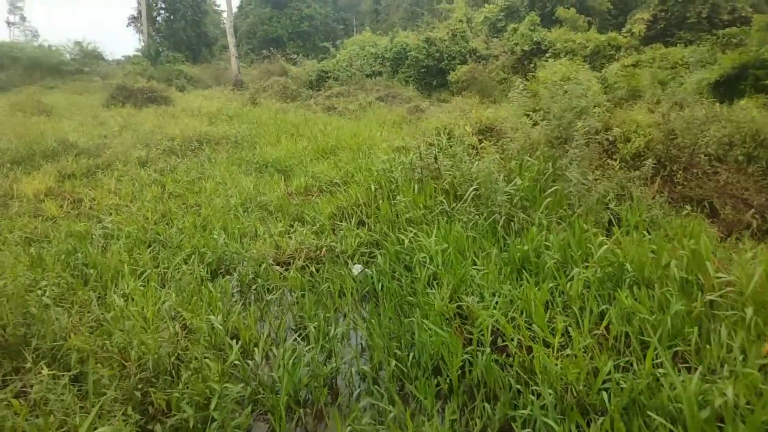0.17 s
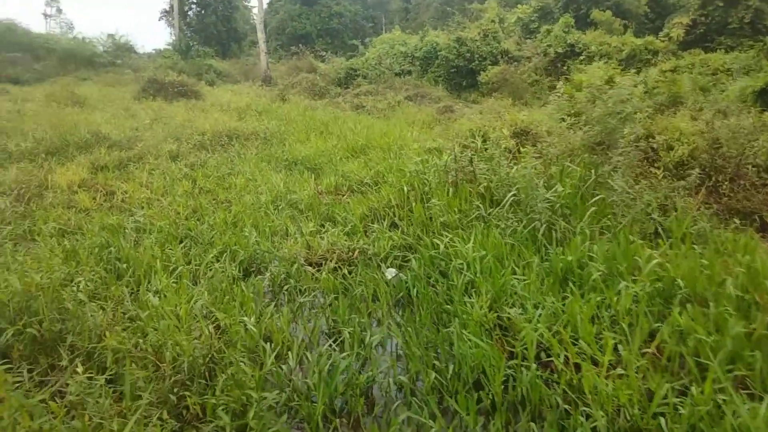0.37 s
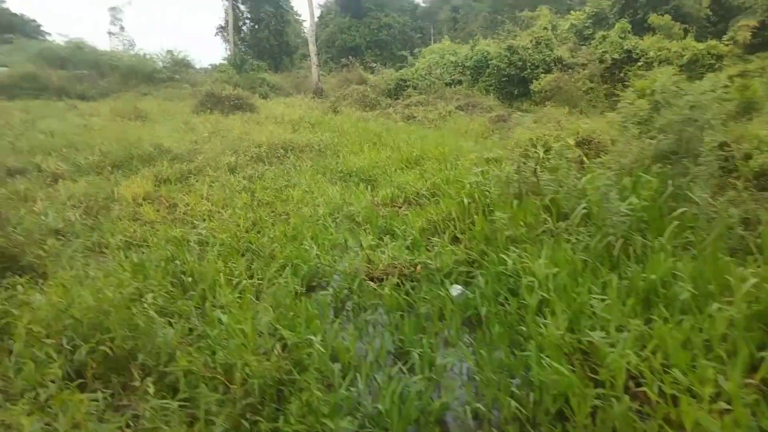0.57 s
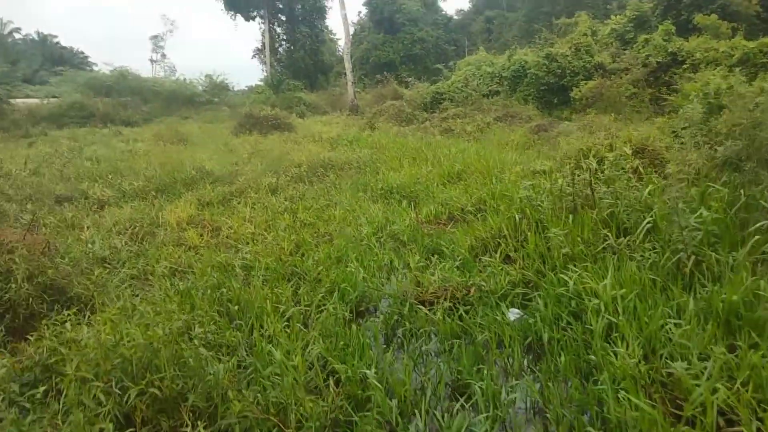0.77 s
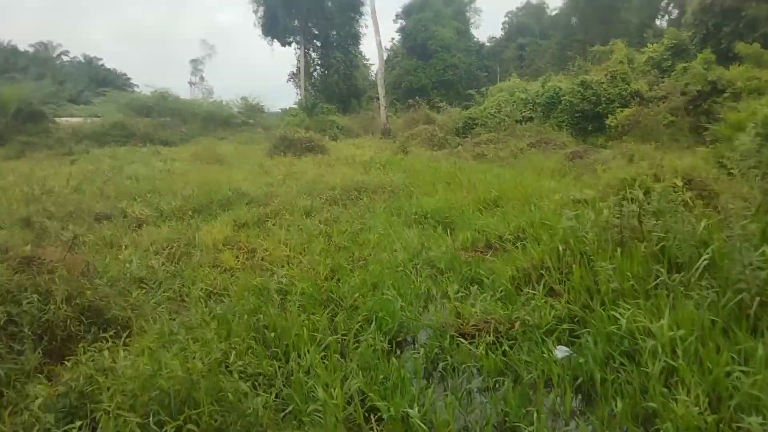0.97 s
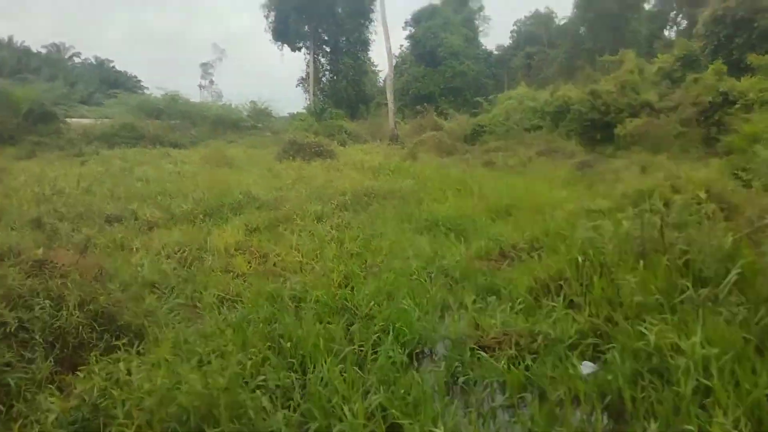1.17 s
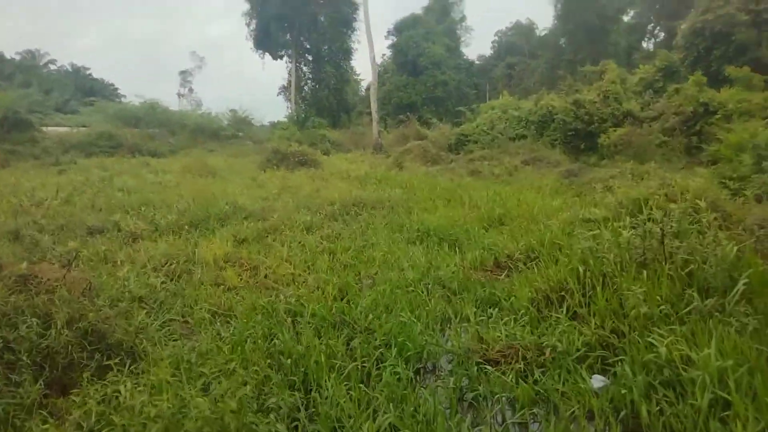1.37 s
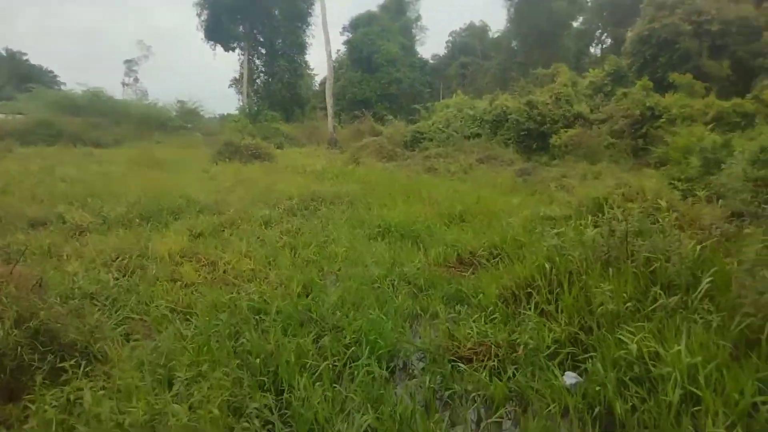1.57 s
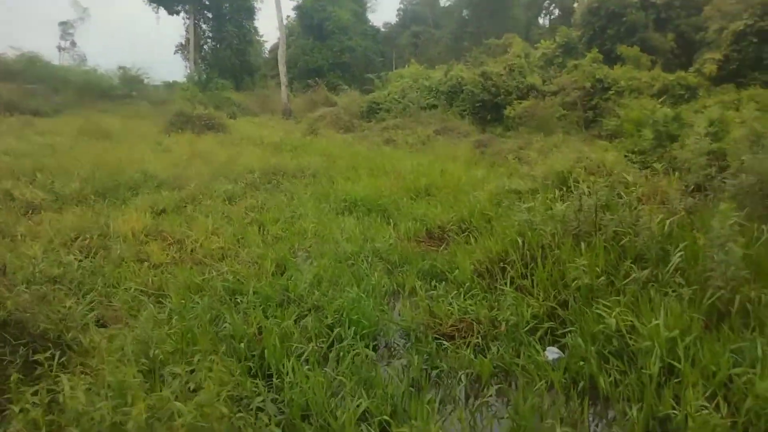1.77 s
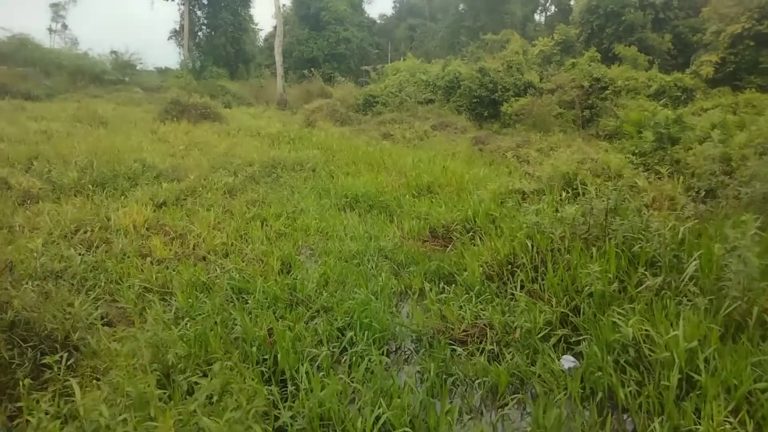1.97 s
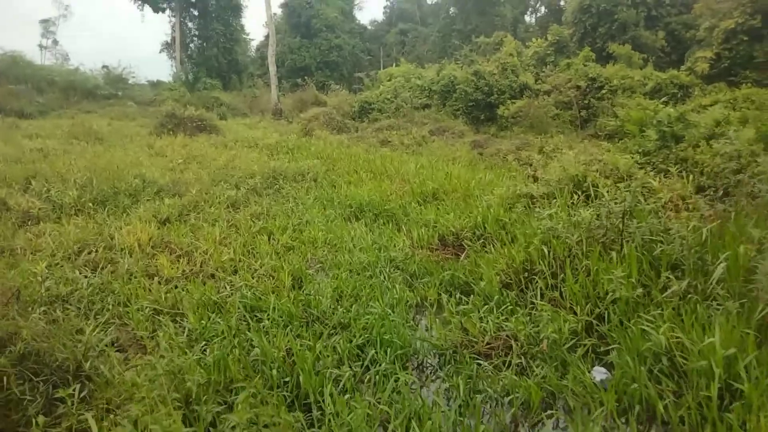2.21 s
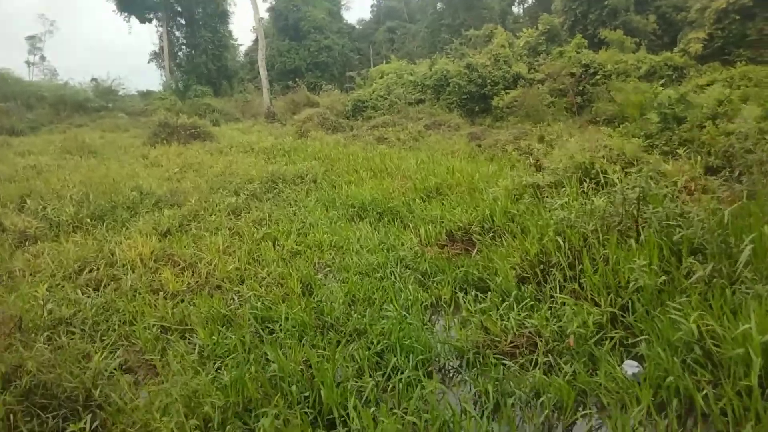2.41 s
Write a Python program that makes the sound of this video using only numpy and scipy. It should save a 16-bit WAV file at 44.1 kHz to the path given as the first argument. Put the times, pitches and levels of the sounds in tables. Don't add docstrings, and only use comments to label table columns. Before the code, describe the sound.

A nearby frog croaks four times in quick, even succession, each a short dry rattle of fast pulses; then wet stems crackle and snap close to the microphone, with faint far frogs and soft insects outdoors.

```python
import sys
import numpy as np
from scipy import signal
from scipy.fft import rfft, irfft
from scipy.io import wavfile

SR = 44100
rng = np.random.default_rng(int(sys.argv[2]) if len(sys.argv) > 2 else 0)


def boost_factor(decibels):
    exponent = np.asarray(decibels, float) / 20
    return 10 ** exponent


def unload_audio(sound):
    columns = np.transpose(np.atleast_2d(sound))
    steps = np.round(np.clip(columns, -1, 1) * 32767)
    wavfile.write(sys.argv[1], SR, steps.astype(np.int16))


N = 108045

# start in seconds, slowest pulse gap in seconds,
# time of the closing speed-up in seconds, time taken to slow down in seconds.
NEAR_CALLS = [
    (.1141, .0044, .0547, .00415),
    (.291, .00548, .039, .00707),
    (.4686, .00501, .0448, .00525),
    (.6585, .0056, .0371, .00795),
]
FAR_CALLS = [
    (1.5348, .00443, .0729, .00454),
    (1.7382, .00499, .0541, .00357),
    (1.936, .00485, .0578, .00404),
]
FARTHEST_CALLS = [
    (.862, .0045, .07, .004),
    (1.612, .0045, .04, .004),
    (1.797, .0045, .045, .004),
    (2.11, .0045, .09, .004),
    (2.295, .0045, .08, .004),
]
NEAR_LEVELS = [-14.5, -14.5, -13.5, -15]
FAR_LEVELS = [-36, -35.5, -36]
FARTHEST_LEVELS = [-48.5, -52.5, -47, -56, -55]
NEAR_SWELLS = [3, -1, 0, -.5]
FAR_SWELLS = [1, 1, -1]
# pitch in Hz, level in dB, swell time in seconds, after-ring level in dB,
# after-ring t60 in seconds, fade late in the call in dB per second.
NEAR_SAC = [(1640, -5.5, .00095, -3, .013, 800), (2270, -1, .00057, -13, .03, 1100),
            (3780, -.5, .001, -20, .03, 1400), (4040, -5.5, .0008, -16, .02, 1400),
            (4880, -19.5, .0004, -3, .022, 1500)]
FAR_SAC = [(2200, -7, .0008, -9, .02, 900), (2800, -6, .0005, -12, .015, 1500),
           (3520, 0, .0006, -11, .02, 600), (3850, -12, .0008, -11, .02, 400)]

# time in seconds, level in dB.
TRAMPLING = [(0.1, -43), (0.24, -38.5), (0.42, -39), (0.62, -49), (0.76, -39.5), (0.84, -53.5),
             (0.992, -38.5), (1.148, -43), (1.248, -33), (1.3, -41.5), (1.36, -40.5), (1.5, -46),
             (1.66, -42.5), (1.72, -42.5), (1.8, -38), (1.92, -44.5), (2.1, -50.5), (2.17, -45.5)]
# time in seconds, level in dB.
BRUSHING = [(0.0, -56), (0.01, -58), (0.3, -51.5), (0.35, -62), (0.42, -49), (0.51, -70), (0.76, -65),
            (0.77, -59), (0.79, -75), (0.87, -76), (0.9, -54), (1.01, -51), (1.42, -62), (1.62, -56.5),
            (1.8, -53), (2.01, -73), (2.44, -71), (2.45, -66)]
# frequency in Hz, level in dB.
CRACKLE_COLOUR = [(200, -24.5), (500, -17.5), (1300, -13), (1800, -2.5), (2200, 0), (2600, -5.5),
                  (3100, -15), (4500, -25.5)]
SWISH_COLOUR = [(2500, 5), (5000, -19), (6500, -5), (9000, 8), (12500, -2), (15000, 6.5)]
# time in seconds, level in dB, pitch in Hz.
BLADE_SNAPS = [(0.2342, -30.0, 2010), (0.3853, -29.0, 2060), (0.7502, -27.0, 1920), (0.7622, -31.0, 2170),
               (0.7687, -30.0, 2090), (0.777, -34.0, 2120), (0.9161, -31.0, 2170), (0.9494, -32.0, 2100),
               (0.9565, -33.0, 2010), (0.9788, -29.0, 1760), (0.985, -27.0, 1910), (0.994, -27.0, 2300),
               (1.0008, -33.0, 2020), (1.0071, -33.0, 2100), (1.0151, -30.0, 2080), (1.0216, -30.0, 2070),
               (1.03, -32.0, 2000), (1.0452, -30.0, 2060), (1.1282, -32.0, 2050), (1.1785, -32.0, 2090),
               (1.2193, -25.0, 2200), (1.2366, -28.0, 2060), (1.2451, -24.0, 2150), (1.2527, -27.0, 2190),
               (1.2593, -28.0, 2180), (1.2656, -30.0, 2250), (1.2735, -30.0, 2310), (1.2885, -31.0, 2190),
               (1.3395, -30.0, 2190), (1.348, -31.0, 2210), (1.3544, -30.0, 2160), (1.3709, -32.0, 2350),
               (1.4417, -27.0, 2040), (1.4509, -32.0, 2170), (1.4583, -34.0, 2230), (1.4963, -33.0, 2070),
               (1.5493, -32.0, 2150), (1.5622, -33.0, 2170), (1.569, -31.0, 2130), (1.6462, -24.0, 2120),
               (1.6529, -32.0, 2170), (1.6669, -26.0, 2230), (1.6751, -34.0, 2140), (1.6937, -33.0, 2230),
               (1.7349, -29.0, 2330), (1.7428, -26.0, 2060), (1.7505, -32.0, 2180), (1.76, -29.0, 2040),
               (1.7927, -33.0, 2100), (1.8, -33.0, 2160), (1.8078, -30.0, 1980), (1.8318, -29.0, 2110),
               (1.8381, -26.0, 2110), (1.9298, -32.0, 2010), (1.944, -30.0, 2190), (1.9526, -34.0, 2130),
               (2.1629, -31.0, 2030), (2.169, -35.0, 2260), (2.1766, -33.0, 2050), (2.3013, -35.0, 2290)]
STEM_KNOCKS = [(0.1271, -36, 660), (0.2303, -33.5, 770), (0.3253, -39, 890), (0.4338, -32.5, 1090),
               (0.7503, -36, 654), (0.7699, -31, 1150), (0.9154, -39.5, 880), (0.9779, -36.5, 950),
               (0.995, -27, 980), (1.0454, -38, 666), (1.1318, -39.5, 624), (1.2478, -42, 930),
               (1.4408, -33, 1220), (1.5746, -39, 1020), (1.6465, -36, 930), (1.6597, -30, 1030),
               (1.6684, -31, 920), (1.7443, -29, 1130), (1.7756, -41, 680), (1.9319, -41, 1020),
               (1.9876, -38.5, 496), (2.0261, -45, 635), (2.1668, -39, 433), (2.2331, -50, 640)]
DRY_TICKS = [(0.0149, -48.0, 14740), (0.1244, -42.0, 13060), (0.2319, -46.0, 14450), (0.24, -47.0, 13300),
             (0.2845, -46.0, 13440), (0.3024, -43.0, 13980), (0.4107, -49.0, 13650), (0.4189, -49.0, 12830),
             (0.4617, -47.0, 13030), (0.6695, -47.0, 14980), (0.7684, -47.0, 12300), (0.9852, -45.0, 14160),
             (0.997, -41.0, 13570), (1.0121, -43.0, 13270), (1.0452, -45.0, 12990), (1.0758, -45.0, 13340),
             (1.086, -44.0, 14050), (1.4405, -50.0, 12400), (1.5251, -48.0, 15020), (1.5727, -40.0, 14950),
             (1.629, -45.0, 14040), (1.6972, -46.0, 14830), (1.7901, -40.0, 11960), (1.9391, -49.0, 14170)]
# time in seconds, level in dB, pitch in Hz, t60 in seconds.
DRIPS = [
    (.258, -30, 3130, 0.013),
    (1.076, -26, 4000, 0.0081),
    (1.261, -39, 4150, 0.018),
    (.957, -39, 4150, .015),
    (1.727, -40, 8200, .01),
]
# start in seconds, length in seconds, level in dB, from Hz, to Hz.
SQUEAKS = [
    (1.05, .027, -46, 4400, 4380),
    (1.398, .009, -46, 4350, 3900),
    (1.448, .016, -39, 2000, 2650),
    (1.479, .021, -38, 3150, 1900),
]

# frequency in Hz, level in dB.
AIR_COLOUR = [(15, -78), (25, -21), (108, -12.5), (277, -7), (768, -12.5), (1220, -14.5), (2010, 0),
              (2360, -3.5), (3000, -39), (3900, -28), (6600, -120)]
# time in seconds, level in dB.
BREEZE = [(0.0, -51), (0.04, -62), (0.91, -73.5), (1.01, -62), (1.03, -62.5), (1.44, -63.5), (1.5, -64.5),
          (2.2, -73), (2.22, -71.5), (2.45, -60)]
# centre in Hz, width in Hz, level in dB, throb in dB.
INSECTS = [(3796, 420, -56, 5.5), (4614, 375, -60, 4), (8457, 640, -54.5, 1.9), (10310, 660, -62, 1.2),
           (6420, 120, -78.5, 0)]
# time in seconds, level in dB.
CHOIR_WAKES = [
    (.1, -14),
    (.2, 0),
    (1.36, 0),
    (1.43, -8),
    (1.55, -8),
    (1.62, 0),
]


def sac_pulse(sac, late, drift, luck):
    spread, scatter_db = 0.0045, 0.5
    t = np.arange(1200) / SR
    pulse = np.zeros(len(t))
    for k, (hz, mode_db, swell, after_db, t60, fade) in enumerate(sac):
        burst = (t / swell * np.exp(1 - t / swell)) ** 2
        after = boost_factor(after_db - 60 * t / t60) * (1 - np.exp(-(t / swell) ** 2))
        pitch = hz * (1 + spread * luck[k] + drift * late)
        phase = min(late / 0.0035, 3) * luck[k + 10]
        wave = np.sin(2 * np.pi * pitch * t + phase)
        polarity = np.sign(3000 - hz)
        level = boost_factor(mode_db - fade * late + scatter_db * luck[k + 5])
        pulse += polarity * level * (burst + after) * wave
    return pulse


def pulse_gap(u, slow, turn, ease):
    fast, lead, turn_width = .00152, .0019, .0063
    slowing = 1 - np.exp(-(u + lead) / ease)
    hurrying = 1 + np.exp((u - turn) / turn_width)
    return fast + (slow - fast) * slowing / hurrying


def frog(calls, levels_db, swells_db, sac, echo_db, drift):
    fade_lag, fade_soft = 0.0058, 0.0035
    stutter_s, stutter_db = .0012, -4
    out = np.zeros(N)
    for (start, slow, turn, ease), db, swell_db in zip(calls, levels_db, swells_db):
        u = 0.
        for luck in rng.standard_normal((40, 15)):
            late = fade_soft * np.log1p(np.exp((u - turn - fade_lag) / fade_soft))
            pulse = sac_pulse(sac, late, drift, luck)
            add(out, start + u, boost_factor(db + swell_db * (min(u / turn, 1) - 1)) * pulse)
            if u == 0 and swell_db > 1:
                add(out, start - stutter_s, boost_factor(db - swell_db + stutter_db) * pulse)
            u += pulse_gap(u, slow, turn, ease)
    out = signal.sosfilt(signal.butter(4, [1390, 5550], "band", fs=SR, output="sos"), out)
    return out + boost_factor(echo_db) * meadow_echo(out)


def meadow_echo(x):
    t60 = 0.22
    t = np.arange(9000) / SR
    tail = rng.standard_normal(9000) * boost_factor(-60 * t / t60) * (t > .002)
    return signal.oaconvolve(x, evened(tail) / np.sqrt(9000))[:N]


def grass():
    clump = wander(8.9)
    return crackle(clump) + swish(clump) + stem_hits() + drips() + squeaks()


def crackle(clump):
    clicks = crackles(1.9, 0.77) * boost_factor(1.6 * clump)
    return boost_factor(-1 + np.maximum(along(TRAMPLING), -52.)) * coloured(clicks, CRACKLE_COLOUR)


def swish(clump):
    stroke_db = 0.77 * (along(BRUSHING) + 63)
    fizz = crackles(2., 0.71) * boost_factor(stroke_db + 2.5 * clump + 0.38 * wander(2.9))
    return boost_factor(-54.5) * coloured(fizz, SWISH_COLOUR)


def stem_hits():
    out = np.zeros(N)
    for hits, swell, trim_db in ((BLADE_SNAPS, .0012, .5), (STEM_KNOCKS, .0011, -1), (DRY_TICKS, .00035, -.5)):
        for (s, db, hz), luck in zip(hits, rng.random((len(hits), 2))):
            time = swell * (.75 + luck[0] / 2)
            add(out, s - time, boost_factor(db + trim_db) * blip(hz, time, luck[1]))
    return out


def drips():
    out = np.zeros(N)
    for s, db, hz, t60 in DRIPS:
        add(out, s, boost_factor(db) * ring(hz, t60, glide=0.06))
    return out


def squeaks():
    out = np.zeros(N)
    for s, length, db, from_hz, to_hz in SQUEAKS:
        count = round(length * SR)
        turns = np.cumsum(np.geomspace(from_hz, to_hz, count)) / SR
        add(out, s, boost_factor(db) * np.sqrt(np.hanning(count)) * np.sin(2 * np.pi * turns))
    return out


def insects():
    out, hz = np.zeros(N), np.fft.rfftfreq(N, 1 / SR)
    for centre_hz, width, db, throb_db in INSECTS:
        skirt = (1 + ((hz - centre_hz) / width) ** 2) ** 1.43
        band = irfft(rfft(rng.standard_normal(N)) / skirt, N)
        wake_db = (abs(centre_hz - 3800) < 300) * along(CHOIR_WAKES)
        out += boost_factor(db + throb_db * wander(3.3) + wake_db) * evened(band)
    return out


def air():
    still = boost_factor(-53 + 3.43 * wander(15.4)) * coloured(rng.standard_normal(N), AIR_COLOUR)
    rumble = coloured(rng.standard_normal(N), [(50, -22), (110, 7), (250, -1.5), (400, 7)])
    return still + boost_factor(along(BREEZE) + 1.0 + 2. * wander(6.1)) * rumble


def crackles(spread_db, hiss):
    struck = rng.random(N) < 1500 / SR
    size = boost_factor(spread_db * np.minimum(rng.exponential(1, N), 3)) * struck
    return evened(size * rng.standard_normal(N)) + hiss * rng.standard_normal(N)


def blip(hz, swell, phase):
    t = np.arange(0, 8 * swell, 1 / SR)
    return (t / swell * np.exp(1 - t / swell)) ** 2 * np.sin(2 * np.pi * (hz * t + phase))


def ring(hz, t60, glide):
    t = np.arange(3000) / SR
    wave = np.sin(2 * np.pi * hz * t * (1 + glide * t / t60))
    return wave * boost_factor(-60 * t / t60) * (1 - np.exp(-t / 0.00011))


def coloured(x, points):
    hz = np.abs(np.fft.fftfreq(4096, 1 / SR)) + 1
    f, db = np.transpose(points)
    octaves_out = np.maximum(np.log2(hz / f[-1]), 0) + np.maximum(np.log2(f[0] / hz), 0)
    gain_db = np.interp(np.log(hz), np.log(f), db) - 18 * octaves_out
    log_gain = np.log(boost_factor(np.maximum(gain_db, -100)))
    taps = np.fft.ifft(np.exp(np.conj(signal.hilbert(log_gain)))).real
    return evened(signal.oaconvolve(x, taps[:2048])[:N])


def wander(rate_hz):
    slow = signal.lfilter(*signal.butter(2, rate_hz, fs=SR), rng.standard_normal(N + SR))
    return evened(slow[SR:])


def along(curve):
    return np.interp(np.arange(N) / SR, *np.transpose(curve))


def evened(x):
    return x / np.sqrt(np.mean(x ** 2) + 1e-20)


def add(mix, s, sound):
    part = mix[round(s * SR):][:len(sound)]
    part += sound[:len(part)]


def scene():
    near = frog(NEAR_CALLS, NEAR_LEVELS, NEAR_SWELLS, NEAR_SAC, echo_db=-17, drift=-1.1)
    far = frog(FAR_CALLS, FAR_LEVELS, FAR_SWELLS, FAR_SAC, echo_db=-6, drift=0.84)
    no_swell = np.zeros(len(FARTHEST_CALLS))
    farthest = frog(FARTHEST_CALLS, FARTHEST_LEVELS, no_swell, NEAR_SAC[2:4], echo_db=-11, drift=0)
    return (near + far + farthest + grass() + insects() + air())[None]


def roll_off(x):
    return signal.sosfilt(signal.butter(12, 16790, fs=SR, output="sos"), x)


def record(dry):
    mic = signal.sosfilt(signal.butter(1, 70, "high", fs=SR, output="sos"), dry)
    treble_limit = signal.firwin(801, 15600, window=("kaiser", 9), fs=SR)
    mic = signal.oaconvolve(mic, treble_limit[None], "same")
    return roll_off(mic)


dry = scene()
out = record(dry)
unload_audio(out)
```